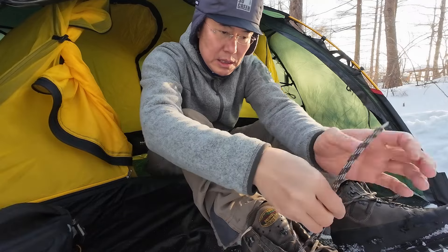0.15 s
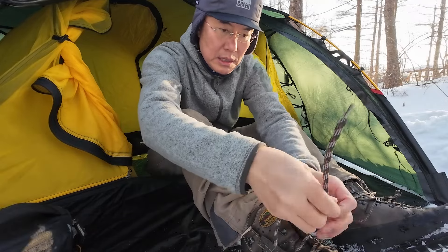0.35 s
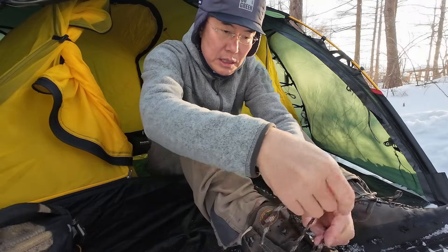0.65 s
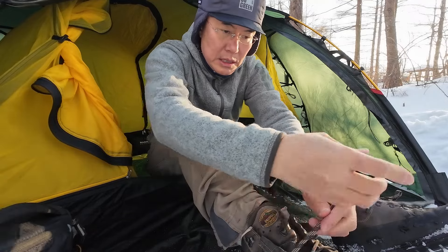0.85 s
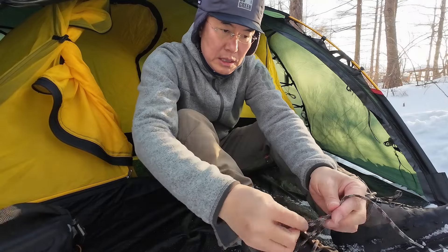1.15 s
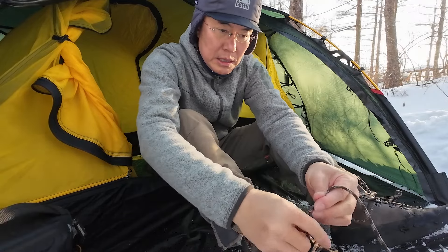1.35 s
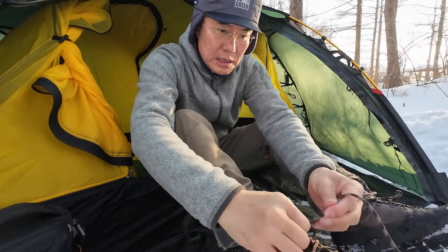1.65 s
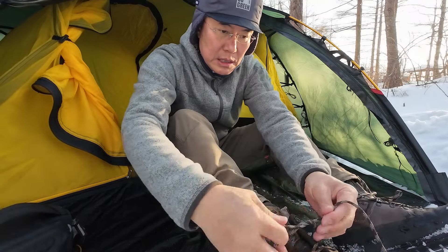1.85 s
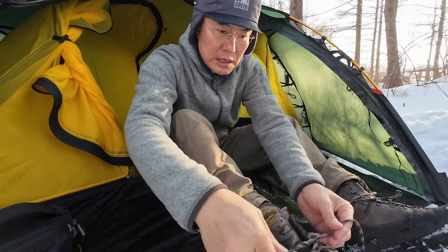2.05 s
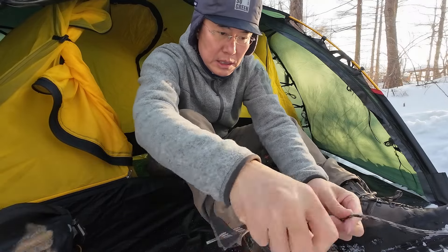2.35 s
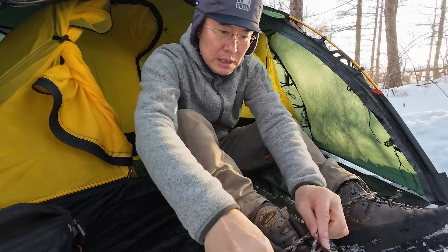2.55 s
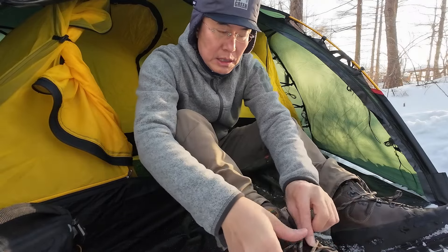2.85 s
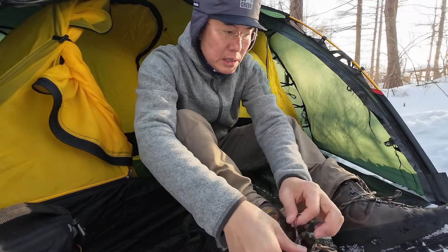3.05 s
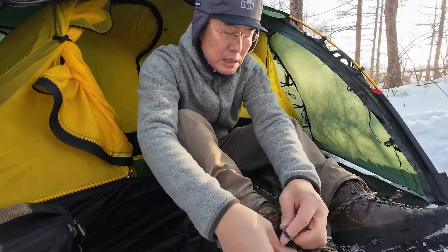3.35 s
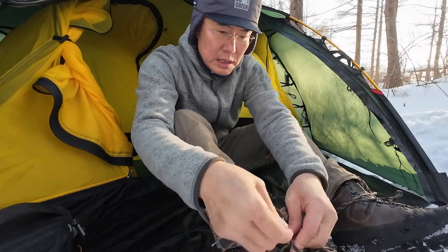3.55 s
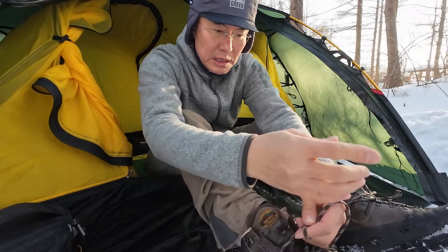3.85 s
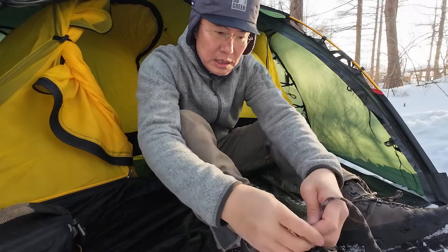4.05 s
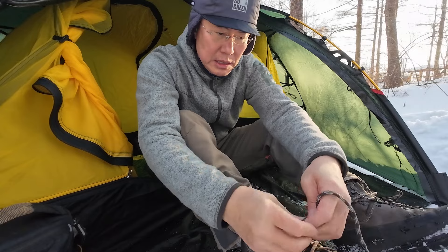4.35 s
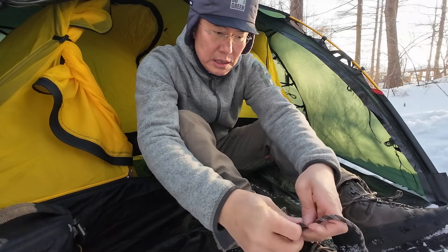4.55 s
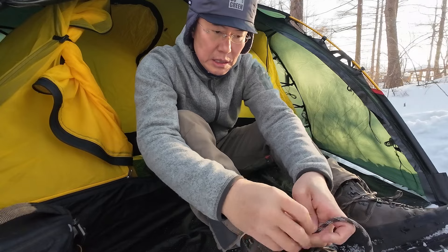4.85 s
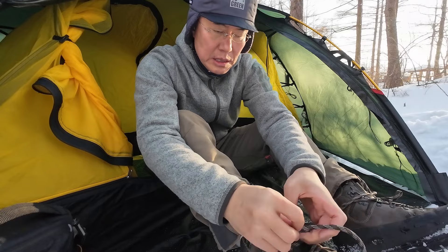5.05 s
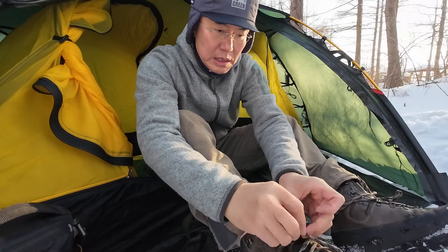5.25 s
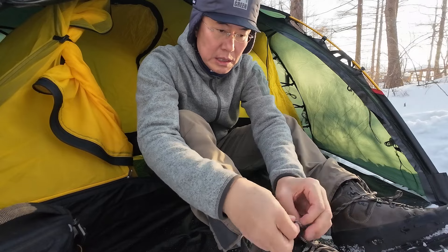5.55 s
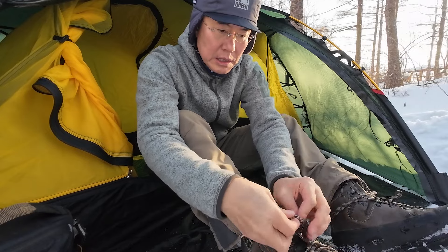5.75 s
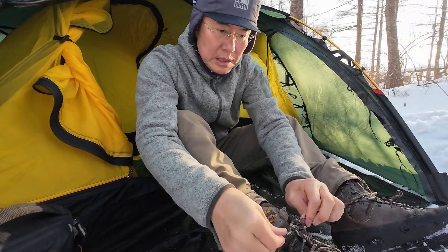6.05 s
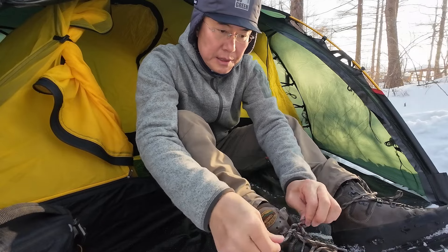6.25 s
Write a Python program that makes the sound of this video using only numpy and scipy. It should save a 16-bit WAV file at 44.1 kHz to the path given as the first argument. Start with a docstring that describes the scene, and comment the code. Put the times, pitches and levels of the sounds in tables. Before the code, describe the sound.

Hands work a braided lace on a leather boot: grainy rubbing, airy swishes, an early crisp snap, light ticks and muffled thumps over faint rumble.

```python
"""Boot laces are pulled and hooked by hand in the doorway of a tent, in a still, snowy wood.
From start to end there is a faint outdoor rumble, hiss and drone, all made from shaped noise.
At once the cord swishes through the fingers and cord, sleeve and cloth rub: grainy noise that swells and fades.
Early on a lace tip snaps against the boot with a quick rattle of rebounds, as a set of short ringing tones.
Then, now and again, boot and cord thump, the cord knocks on leather and the lace clicks on hooks: struck rings."""
import sys
import numpy as np
from scipy import signal
from scipy.fft import rfft, irfft, next_fast_len
from scipy.io import wavfile

SR = 44100
rng = np.random.default_rng(int(sys.argv[2]) if len(sys.argv) > 2 else 0)


def digitize_waveform(pressure):
    """Quantize a signal to 16-bit integers and store it at the path in sys.argv[1].

    Rows of a 2-D input are taken as channels; values are limited to [-1, 1].
    """
    field = np.atleast_2d(pressure).T
    bounded = np.clip(field, -1, 1)
    quanta = np.round(bounded * 32767).astype(np.int16)
    wavfile.write(sys.argv[1], SR, quanta)


N = 281799
TIME = np.arange(N) / SR  # seconds

# Levels in the tables are set before the echoes, the gain at each ear and the microphone.
# t60_s is the time a sound takes to die away by 60 dB.

# Tone colours, only the shape counts. Columns: pitch_hz, level_db (per Hz)
RUMBLE_COLOUR = [(12, -11.5), (24, 7), (38, -3), (60, -5.5), (100, -12), (200, -27.5), (600, -68)]
AIR_COLOUR = [(12, -8), (30, -8), (55, -5), (90, -12.5), (200, -17.5), (270, -20), (700, -24), (1500, -30),
              (2400, -30.5), (4700, -32), (7000, -38.5), (13500, -48.5), (16000, -68)]
SWISH_COLOUR = [(2500, -23), (4000, -8.5), (6800, -9.5), (8000, -6.5), (10000, -5), (11800, -6.5),
                (13400, -3), (14500, -4), (16000, -7)]
RUB_COLOUR = [(400, -9), (750, 3), (1400, 0), (2400, 0), (3500, -1.5), (5000, -11), (7000, -13),
              (12000, -18.5)]
SHIFT_COLOUR = [(70, -1), (120, 0.5), (280, -1.5), (420, -5.5), (700, -5.5), (1100, -18), (2500, -38)]

# How alike left and right are, for far and near sounds. Columns: pitch_hz, likeness (0 to 1, no unit)
AIR_LIKENESS = [(30, 0.68), (130, 0.4), (600, 0.33), (1500, 0.23), (6000, 0.27), (15000, 0.21)]
NEAR_LIKENESS = [(100, 1), (500, 0.92), (1500, 0.98), (4000, 1), (9000, 1), (15000, 0.34)]

# Low rumble that swells and sinks, before its random wandering. Columns: time_s, level_db
RUMBLE = [(0.0, -52), (0.45, -56), (1.0, -49), (1.75, -51), (2.2, -51), (2.8, -53), (3.35, -51.5),
          (4.5, -56), (5.25, -55.5), (5.85, -49.5), (6.39, -57)]
# Faint distant drone. Columns: pitch_hz, width_hz, level_db
DRONE = [(64, 33, -67), (122, 6.3, -69.5)]

# Cord pulled through the fingers. Columns: peak_s, length_s, level_db
PULLS = [(0.03, 0.078, -53.5), (0.12, 0.12, -47.5), (0.22, 0.17, -58.5), (0.49, .035, -54),
         (0.565, 0.078, -58.5), (0.73, 0.1, -59.5), (0.82, 0.053, -52), (0.94, 0.16, -61),
         (1.11, 0.22, -66), (1.277, 0.011, -52.5), (1.49, 0.035, -58.5), (1.65, 0.02, -54),
         (1.74, 0.21, -61.5), (1.84, 0.12, -52.5), (1.965, 0.085, -50.5), (2.04, 0.1, -49.5),
         (2.23, 0.1, -49), (2.295, 0.053, -53), (2.435, 0.028, -49.5), (2.52, 0.13, -61.5),
         (2.69, 0.23, -66.5), (2.97, 0.12, -59.5), (3.1, 0.069, -54), (3.23, 0.21, -59.5),
         (3.395, 0.058, -51.5), (3.45, 0.046, -53.5), (3.66, 0.12, -63.5), (3.77, 0.098, -55),
         (4.0, 0.48, -74), (4.25, 0.22, -67), (4.59, 0.082, -54.5), (4.7, 0.14, -64), (4.8, 0.025, -57),
         (5.12, 0.31, -66.5), (5.36, 0.12, -65), (5.49, 0.15, -57), (5.645, 0.12, -63), (5.87, 0.12, -58.5),
         (6.03, 0.17, -50), (6.2, 0.067, -58), (6.32, 0.15, -59.5)]
# Cord and sleeve rubbing across the boot. Columns: peak_s, length_s, level_db, resonance_hz
RUBS = [(0.025, 0.073, -62, 1130), (0.14, 0.11, -50.5, 1690), (0.493, 0.14, -63, 1690),
        (0.927, 0.42, -67, 1100), (1.062, 0.13, -51, 1440), (1.135, .13, -54.5, 1980),
        (1.416, 0.4, -58, 1260), (1.855, 0.19, -57.5, 1850), (2.075, 0.089, -52, 1020),
        (2.22, 0.12, -53, 1490), (2.485, 0.35, -60, 1550), (2.716, 0.21, -59, 1400),
        (2.963, 0.15, -55, 1570), (3.093, 0.065, -49, 1290), (3.248, 0.18, -56.5, 1680),
        (3.437, 0.098, -48.5, 1770), (3.52, 0.15, -53.5, 2640), (3.693, 0.12, -55, 1530),
        (3.783, 0.091, -51, 1460), (3.953, 0.11, -53, 1370), (4.06, 0.12, -50.5, 1740),
        (4.306, 0.23, -61.5, 1590), (4.677, 0.37, -60.5, 1570), (5.128, 0.21, -60.5, 1340),
        (5.308, 0.11, -58, 1250), (5.478, 0.18, -55, 1490), (5.662, 0.1, -55.5, 1510),
        (5.816, 0.13, -60, 1680), (6.044, 0.2, -56.5, 1880), (6.201, 0.053, -58, 1700),
        (6.352, 0.16, -57.5, 2460)]
# Boot and trouser leg shifting. Columns: peak_s, length_s, level_db
SHIFTS = [(0.02, 0.14, -52), (0.11, 0.076, -47.5), (0.83, 0.054, -55), (1.93, 0.39, -58), (2.23, 0.21, -50),
          (2.43, 0.045, -58), (2.96, 0.14, -54.5), (3.21, 0.032, -52.5), (6.05, 0.12, -54.5)]
# Cord rasping round a hook, leather creaking; level is before the fade.
# Columns: middle_s, length_s, level_db, resonance_hz, width_hz
RASPS = [(0.007, 0.033, -50.5, 534, 294), (.095, .09, -56, 650, 500), (1.052, 0.077, -59, 4730, 2480),
         (1.38, 0.14, -56.5, 980, 400), (1.847, 0.084, -57, 232, 37), (2.097, 0.055, -52.5, 850, 450),
         (2.208, 0.072, -53, 316, 50), (3.131, 0.087, -51.5, 1340, 500), (3.446, 0.032, -51.5, 2340, 300),
         (3.544, 0.086, -57, 3330, 250), (3.99, 0.14, -52, 2050, 400), (4.006, 0.2, -53, 1480, 250),
         (4.58, 0.11, -58.5, 5130, 2200), (5.316, 0.089, -60, 980, 600), (5.513, 0.1, -64, 1020, 500),
         (5.875, 0.063, -55.5, 785, 600)]

# The lace tip striking the boot. Columns: start_s, level_db
SNAPS = [(0.107, -33), (0.1104, -30), (.1133, -9.5), (0.1178, -16.5)]
# The tones the tip rings with. Columns: pitch_hz, level_db, t60_s
TIP_MODES = [(613, -30, 0.073), (940, -21, 0.028), (1470, -18, 0.027), (2300, -3, 0.0051),
             (3460, -5, 0.0042), (4870, -10, 0.0048), (6800, -4.5, 0.002), (7900, 0, 0.0013),
             (9600, -11, .0015), (13000, -8, 0.0012)]
# Low thumps of boot and cord, some with a bright crack.
# Columns: start_s, level_db (of the ring), pitch_hz, crack_db (against the ring)
THUMPS = [(.1075, -45.5, 127, -15), (.8200, -35.5, 330, -5), (2.0482, -40, 327, -20),
          (2.211, -45, 300, -10), (2.2356, -34.5, 305, 0), (3.2210, -41.5, 260, 7),
          (3.7720, -41.5, 268, -15), (3.9238, -26.5, 780, -26), (4.1204, -46, 308, -7),
          (5.4847, -47, 205, 12)]
# Taut cord knocking on the leather. Columns: start_s, peak_db, pitch_hz, t60_s, hardness_db (of the overtone)
KNOCKS = [(0.3944, -37.5, 1690, .003, -8), (.8215, -33.5, 980, 0.00097, -10),
          (1.0347, -34, 770, 0.034, -10), (2.047, -32, 980, 0.0051, -12), (2.0752, -28, 860, 0.0071, -31),
          (2.0834, -40, 1010, 0.0097, -17), (2.2354, -37, 1120, .007, -21), (3.261, -43, 796, 0.0082, -18),
          (3.7718, -26.5, 1370, .007, -13), (3.778, -44, 1440, 0.0063, -15), (3.7802, -29, 1370, .012, -23),
          (3.922, -18, 1310, 0.0048, -5), (4.102, -43.5, 1060, .01, -22),
          (5.1384, -32.5, 2150, 0.0043, -30), (5.1388, -45, 900, 0.0033, -20),
          (5.8206, -42.5, 1400, .002, -3)]
# Lace clicking on the metal hooks.
# Columns: start_s, level_db (of the ring), pitch_hz, t60_s, crack_db (against the ring)
CLICKS = [(.8215, -38, 2370, 0.0018, 5), (0.832, -38.5, 13700, 0.0044, 11), (1.0332, -22, 4540, 0.0033, -8),
          (1.0335, -24.5, 5400, 0.0022, -18), (2.1444, -40, 3550, 0.0058, -20),
          (2.2114, -20.5, 7600, 0.0034, -0.5), (2.2104, -24.5, 10200, 0.0024, 9.5),
          (2.214, -30, 13100, 0.0028, -4), (2.7064, -32, 6500, .0015, 0), (3.262, -40, 2300, 0.0015, 1),
          (3.3662, -37.5, 12100, 0.0027, 0), (5.821, -39, 11900, 0.0044, 4)]

# Treble colour of the two microphone ports. Columns: pitch_hz, width_hz, left_gain_db, right_gain_db
PORT_PEAKS = [(7170, 610, -7.5, -2), (7880, 250, 3, 1.5), (10000, 1140, 1, 5), (13400, 480, 11, 8.5)]

AIR_DB = -56  # middle level of the hiss
RUMBLE_SWING_DB, RUMBLE_SWELLS_PER_S = 2.5, 4.37
SWELL_SHARE, STROKE_SHAPE = 0.58, 1.53  # share of a stroke spent swelling; roundness of its peak
# between strokes the fingers never quite rest
IDLE_SWISH_DB, IDLE_RUB_DB, IDLE_SHIFT_DB = -76.5, -69.5, -65.5
CLOTH_FOLLOWS_DB = -12.5  # cloth dragged along by each rub, against the rub
THUMP_CYCLES = 5.6  # swings of a thump before it is 60 dB down
OVERTONE_RATIO, KNOCK_CRACK_DB = 1.82, -15  # overtone over ring pitch; crack against the ring
REBOUND_S, REBOUND_DB = 0.00085, 6  # a hard knock rebounds at once: delay, and dB added to its hardness
PORT_LAG_S, CUTOFF_HZ = 1.6e-5, 15750


def from_db(db):
    """Turn decibels into a gain."""
    return 10 ** (np.asarray(db) / 20)


def rms_one(x):
    """Scale a sound to an average strength (rms) of 1."""
    return x / np.sqrt(np.mean(x ** 2) + 1e-20)


def at_hz(points, hz):
    """Read a curve between its points, with pitch spaced as the ear hears it (log)."""
    point_hz, value = np.transpose(points)
    return np.interp(np.log(hz + 1), np.log(point_hz), value)


def drift(per_s):
    """Wander at random with a spread of 1, joining random points by straight lines."""
    knots = rng.standard_normal(4000)
    return rms_one(np.interp(TIME * per_s, np.arange(len(knots)), knots))


def resonate(x, hz, width_hz):
    """Let through the sound around one pitch, with gain 1 at the top."""
    radius, angle = np.exp(-np.pi * width_hz / SR), 2 * np.pi * hz / SR
    top = np.array([1, 0, -1]) * (1 - radius ** 2) / 2
    return signal.lfilter(top, [1, -2 * radius * np.cos(angle), radius ** 2], x)


def reflect(x, delay_s, level_db):
    """Add one echo from a surface close by; what runs off the end wraps to the start."""
    return x + from_db(level_db) * np.roll(x, round(delay_s * SR), axis=-1)


def add(track, start_s, sound):
    """Mix a sound into a track at a time."""
    start = max(round(start_s * SR), 0)
    track[start:start + len(sound)] += sound[:N - start]


def coloured(colour, likeness, grain=1):
    """Make stereo noise with a tone colour, a left-right likeness and a grain; rms 1."""
    size = next_fast_len(N)
    hz = np.arange(size // 2 + 1) * SR / size
    noise = rng.standard_normal((2, N)) * grain
    mid, side = rfft(noise, size) * from_db(at_hz(colour, hz))
    alike = at_hz(likeness, hz)
    # the side noise goes into the two ears with opposite sign
    pair = np.sqrt(1 + alike) * mid + np.sqrt(1 - alike) * side * [[1], [-1]]
    return rms_one(irfft(pair, size)[:, :N])


def outdoors():
    """Still air is shaped noise, a low rumble and thin hiss; the far drone is noise in narrow bands."""
    rumble_db = np.interp(TIME, *np.transpose(RUMBLE)) + RUMBLE_SWING_DB * drift(RUMBLE_SWELLS_PER_S)
    rumble = from_db(rumble_db) * coloured(RUMBLE_COLOUR, AIR_LIKENESS)
    air = from_db(AIR_DB + 0.5 * drift(3)) * coloured(AIR_COLOUR, AIR_LIKENESS)
    drone = np.zeros(N)
    for hz, width_hz, level_db in DRONE:
        once = resonate(rng.standard_normal(N), hz, width_hz)
        drone += from_db(level_db) * rms_one(resonate(once, hz, width_hz))
    return rumble + air + drone


def fibres(per_s, slip_db, spread_db, t60_s):
    """Friction is steady sliding plus brief slips of single fibres, of uneven size."""
    chance = rng.random(N)
    size = np.minimum(rng.exponential(1, N), 3)
    slips = (chance < per_s / SR) * from_db(slip_db + spread_db * size)
    fade = from_db(-60 / (t60_s * SR))
    return 1 + signal.lfilter([1], [1, -fade], slips + 1e-18)


def strokes(rows):
    """Each hand stroke swells, peaks and dies away; return their gain over time, added in power."""
    power = np.zeros(N)
    for peak_s, length_s, level_db, *_ in rows:
        near = slice(*np.searchsorted(TIME, [peak_s - 2 * length_s, peak_s + 2 * length_s]))
        before = (peak_s - TIME[near]) / SWELL_SHARE
        after = (TIME[near] - peak_s) / (1 - SWELL_SHARE)
        away = np.maximum(before, after) / length_s
        power[near] += (from_db(level_db) * np.exp(-away ** STROKE_SHAPE)) ** 2
    return np.sqrt(power)


def effort(gain, idle_db):
    """The strokes ride on light, aimless fingering that wanders in level."""
    return np.hypot(gain, from_db(idle_db + 2.4 * drift(9.1)))


def swish():
    """The braid hisses over skin, with a fine crackle of fibres."""
    crackle = fibres(per_s=85, slip_db=-12, spread_db=4.0, t60_s=0.016)
    slide = coloured(SWISH_COLOUR, NEAR_LIKENESS, crackle)
    grip_db = 1.5 * drift(70)
    return effort(strokes(PULLS), IDLE_SWISH_DB) * from_db(grip_db) * slide


def rub(gain):
    """Soft friction on the boot; its resonance moves from one point of contact to the next."""
    peak_s, _, _, stroke_hz = np.transpose(RUBS)
    centre_hz = np.interp(TIME, peak_s, stroke_hz)
    slips = fibres(per_s=46, slip_db=-2.0, spread_db=0.5, t60_s=0.01)
    friction = coloured(RUB_COLOUR, NEAR_LIKENESS, slips)
    body = 0
    # fade between fixed resonances to follow the moving pitch
    for hz in np.geomspace(900, 3600, 7):
        nearness = np.exp(-(np.log2(centre_hz / hz) / 0.37) ** 2)
        body = body + nearness * resonate(friction, hz, 0.25 * hz)
    # the boot shaft close by adds a hollow, comb-like colour
    hollow = reflect(from_db(5.5) * friction + body, delay_s=0.000804, level_db=-17.0)
    pressure_db = 1.3 * drift(70)
    return effort(gain, IDLE_RUB_DB) * from_db(pressure_db) * rms_one(hollow)


def shift(rub_gain):
    """Heavy cloth and leather rustle low and lumpy as the leg shifts or with a rub; at rest they brush."""
    moves = np.hypot(strokes(SHIFTS), from_db(CLOTH_FOLLOWS_DB) * rub_gain)
    folds = fibres(per_s=34, slip_db=2, spread_db=3.5, t60_s=0.021)
    rustle = moves * coloured(SHIFT_COLOUR, NEAR_LIKENESS, folds)
    brushing = from_db(IDLE_SHIFT_DB) * coloured(SHIFT_COLOUR, NEAR_LIKENESS)
    return rustle + brushing


def rasps():
    """Short grainy strokes of cord or leather swell and fade, each in its own resonance."""
    out = np.zeros(N)
    friction = rng.standard_normal(N) * fibres(per_s=200, slip_db=-5, spread_db=3.5, t60_s=0.004)
    for middle_s, length_s, level_db, hz, width_hz in RASPS:
        at = np.flatnonzero(np.abs(TIME - middle_s) < length_s / 2)
        narrow = resonate(friction[at], hz, width_hz)
        stroke = rms_one(resonate(narrow, hz, 3 * width_hz))
        fade = np.cos(np.pi * (TIME[at] - middle_s) / length_s)
        out[at] += from_db(level_db) * fade * stroke
    return out


def contact(scatter_db, scatter_t60_s):
    """One touch is a sharp push, then a short scatter of tiny rebounds, made of fading noise."""
    t = TIME[:SR // 20]
    push = from_db(scatter_db - 60 * t / scatter_t60_s) * rng.standard_normal(len(t))
    push[0] = 1
    return push


def ring(push, hz, t60_s):
    """A struck tone that dies away; a unit push starts a sine of height about 1."""
    radius, angle = from_db(-60 / (t60_s * SR)), 2 * np.pi * hz / SR
    return signal.lfilter([0.5, 0, -0.5], [1, -2 * radius * np.cos(angle), radius ** 2], push)


def tip_snap():
    """The hard tip hits and rebounds, ringing all its short tones each time."""
    out = np.zeros(N)
    for start_s, level_db in SNAPS:
        push = contact(scatter_db=-46, scatter_t60_s=0.0051)
        tones = sum(from_db(db) * ring(push, hz, t60_s) for hz, db, t60_s in TIP_MODES)
        add(out, start_s, from_db(level_db) * tones)
    # soften the very top of the treble
    return signal.sosfilt(signal.butter(4, 14500, fs=SR, output="sos"), out)


def touch(hz, t60_s, crack_db):
    """A ring of height 1 with a brief bright crack; the lower the ring, the softer the contact."""
    push = resonate(contact(scatter_db=-24, scatter_t60_s=0.03), hz, 0.53 * hz)
    body = ring(push, hz, t60_s)
    crack_band = signal.butter(2, [2500, 14000], "band", fs=SR, output="sos")
    crack = signal.sosfilt(crack_band, contact(scatter_db=-4, scatter_t60_s=0.006))
    return body / np.abs(body).max() + from_db(crack_db) * crack


def thumps():
    """Low thumps of boot and cord, some with a bright crack; lower ones ring longer."""
    out = np.zeros(N)
    for start_s, level_db, hz, crack_db in THUMPS:
        add(out, start_s, from_db(level_db) * touch(hz, THUMP_CYCLES / hz, crack_db))
    return out


def knocks():
    """Taut cord on leather rings with one overtone; a harder knock has more overtone and rebound."""
    out = np.zeros(N)
    for start_s, peak_db, hz, t60_s, hardness_db in KNOCKS:
        low = touch(hz, t60_s, KNOCK_CRACK_DB)
        overtone = touch(OVERTONE_RATIO * hz, t60_s, KNOCK_CRACK_DB)
        knock = low + from_db(hardness_db) * overtone
        knock = reflect(knock, REBOUND_S, hardness_db + REBOUND_DB)
        add(out, start_s, from_db(peak_db) * knock / np.abs(knock).max())
    return out


def clicks():
    """Metal hooks answer the lace high and short."""
    out = np.zeros(N)
    for start_s, level_db, hz, t60_s, crack_db in CLICKS:
        add(out, start_s, from_db(level_db) * touch(hz, t60_s, crack_db))
    return out


def scene():
    """Right of centre, nearby surfaces echo the hands: rubbing differently at each ear, blows alike."""
    blows = reflect(tip_snap() + thumps() + knocks() + clicks(), delay_s=0.0043, level_db=-22)
    rubbing = strokes(RUBS)
    hands = swish() + rub(rubbing) + shift(rubbing) + rasps()
    left = reflect(hands[0], delay_s=0.0037, level_db=-14.5) + from_db(-2.5) * blows
    right = reflect(hands[1], delay_s=0.0053, level_db=-16.0) + from_db(-1.5) * blows
    # the left port is a little farther away and hears the hands slightly later
    size = next_fast_len(N)
    hz = np.arange(size // 2 + 1) * SR / size
    later = np.exp(-2j * np.pi * hz * PORT_LAG_S)
    left = irfft(rfft(left, size) * later, size)[:N]
    return np.array([left, right]) + outdoors()


def record(dry):
    """The microphone ports colour the treble by resonance; a steep filter cuts the top."""
    for hz, width_hz, left_db, right_db in PORT_PEAKS:
        extra = from_db([[left_db], [right_db]]) - 1
        dry = dry + extra * resonate(dry, hz, width_hz)
    # order 10, 0.2 dB of ripple below the cutoff, 70 dB down above it
    top_cut = signal.ellip(10, 0.2, 70, CUTOFF_HZ, fs=SR, output="sos")
    return signal.sosfilt(top_cut, dry)


dry = scene()
out = record(dry)
digitize_waveform(out)
```